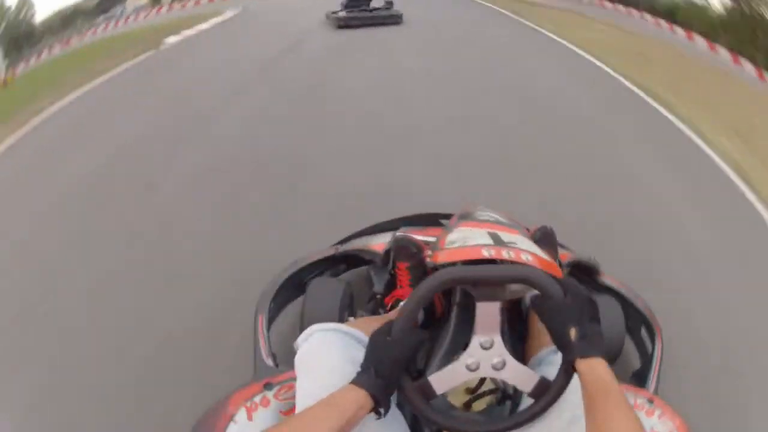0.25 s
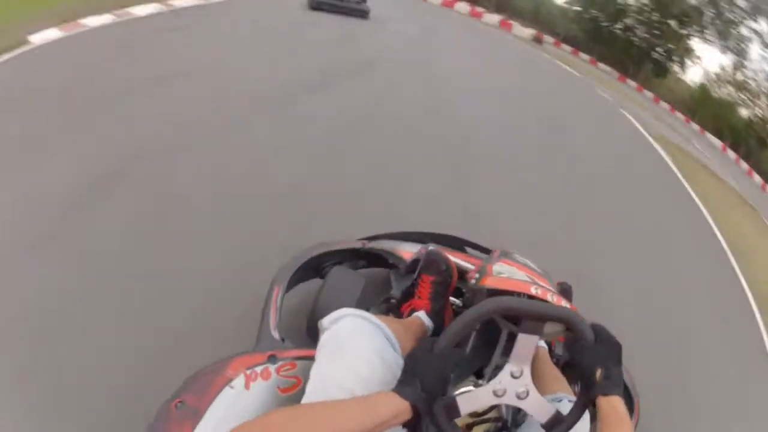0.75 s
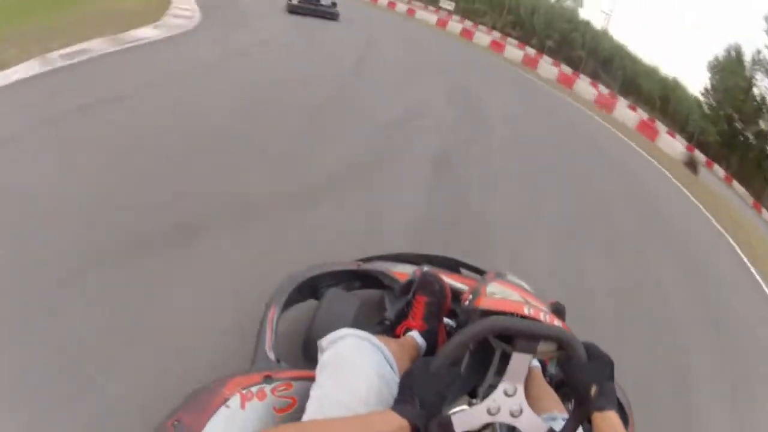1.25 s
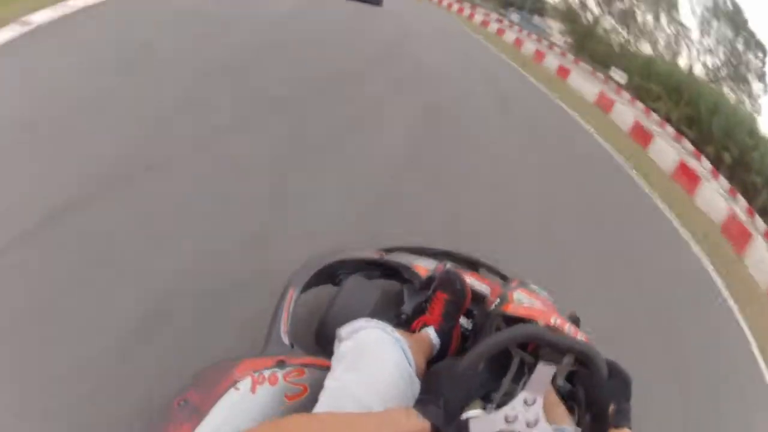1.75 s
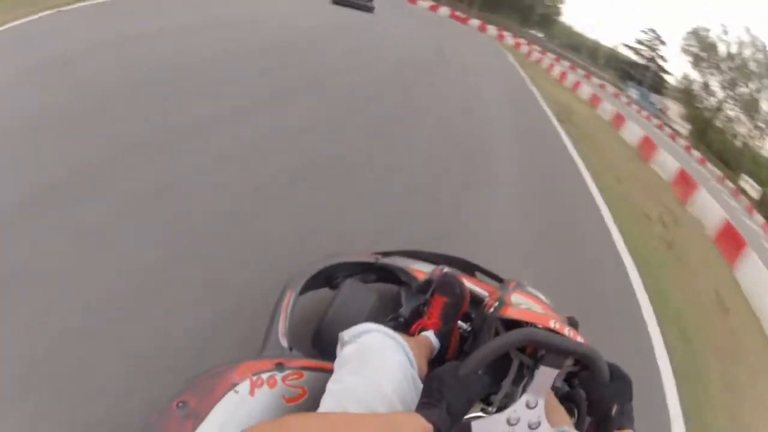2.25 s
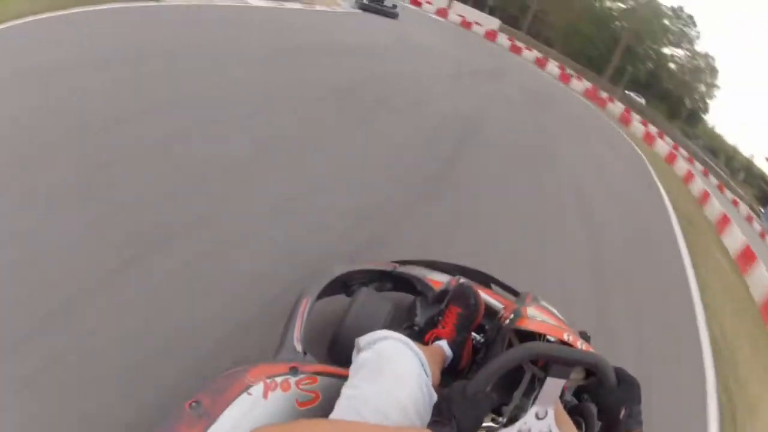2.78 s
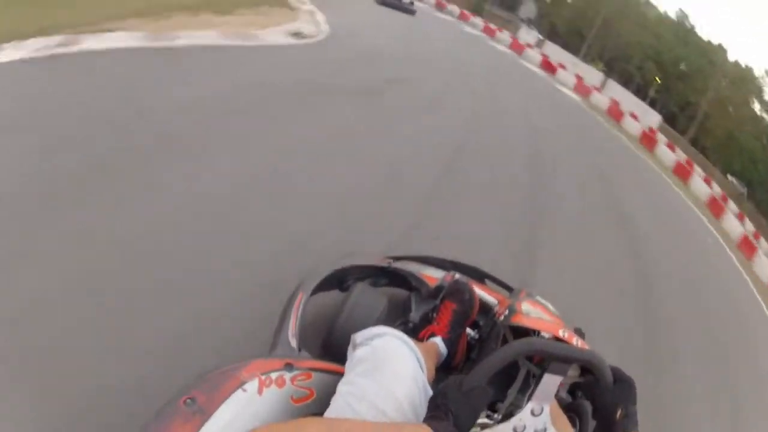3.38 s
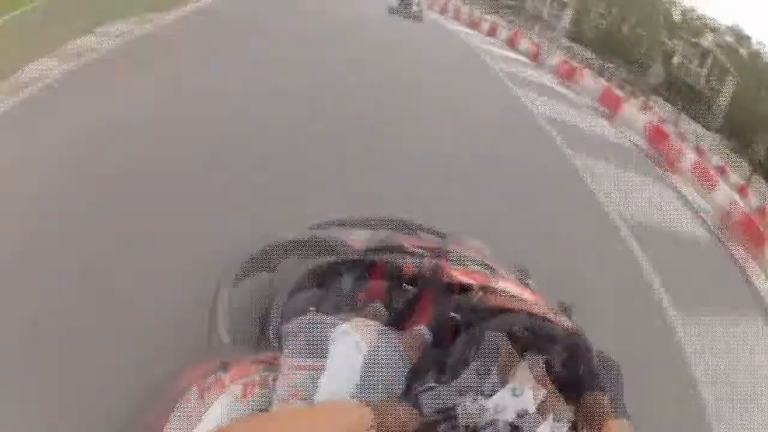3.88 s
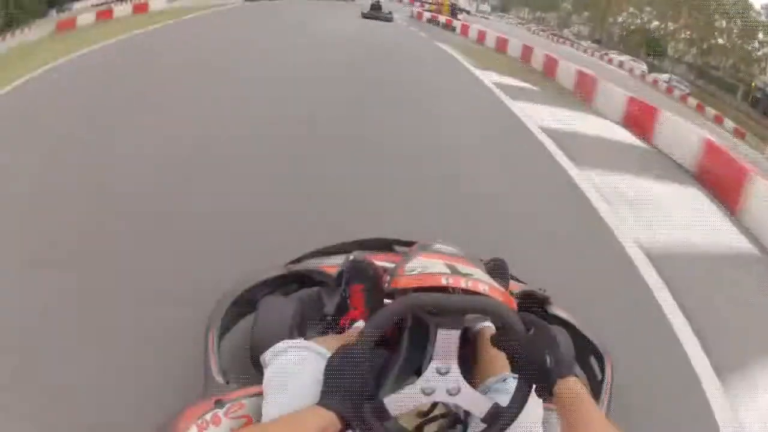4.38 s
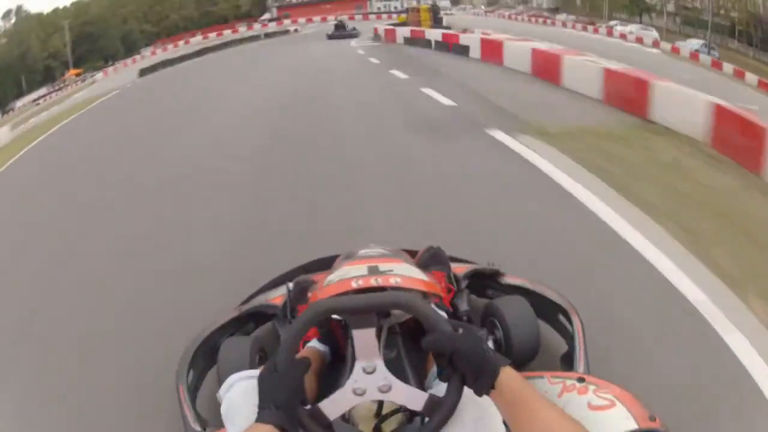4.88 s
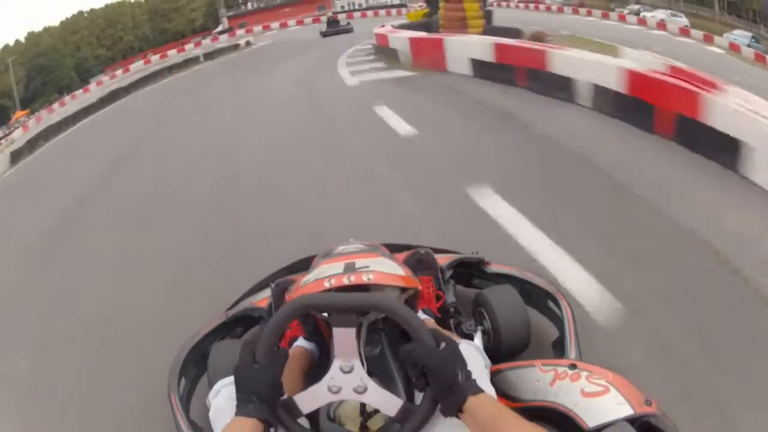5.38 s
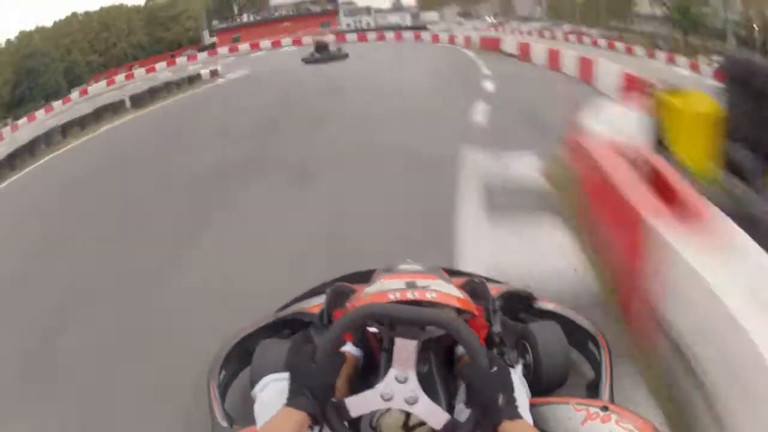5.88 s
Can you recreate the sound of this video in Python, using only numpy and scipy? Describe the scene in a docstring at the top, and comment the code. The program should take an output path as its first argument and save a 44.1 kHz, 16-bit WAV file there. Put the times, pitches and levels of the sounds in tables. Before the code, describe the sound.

Close on a driver's helmet outdoors, a small single-cylinder four-stroke kart drones at high throttle, raspy exhaust puffs mixed with hollow intake honks that soon bark harder. Wind and tyre hiss sit underneath. The sound fades nearly away, then abruptly returns at full level. Near the end the throttle shuts and the engine drops to a hollow, thumping frame boom with tiny tyre chirps, one knock and a short rattle. Narrow, slightly overloaded microphone with a thin metallic sizzle.

```python
"""A single-cylinder four-stroke kart drones and honks at the driver's helmet as it laps an outdoor track.
Each cycle is a ringing exhaust puff with a rasp of gas noise, then two air-box honks; the drive whines in sines.
Coloured noise makes wind and tyre hiss. The sound fades, then cuts back in at 4.46 s.
From 5.34 s the throttle shuts for a corner: the frame booms in thumps, chirps and rattles once.
Coarse sampling mirrors the engine into a thin sizzle near 12 kHz."""
import sys
import numpy as np
from scipy import signal
from scipy.fft import rfft, irfft
from scipy.io import wavfile

SR = 44100
rng = np.random.default_rng(int(sys.argv[2]) if len(sys.argv) > 2 else 0)


def unload_audio(sound):
    """Save the sound as a 16-bit wav file, at the path given as the first command line argument."""
    columns = np.transpose(np.atleast_2d(sound))
    # keep every value between -1 and 1, then stretch to whole-number steps
    steps = np.round(np.clip(columns, -1, 1) * 32767)
    wavfile.write(sys.argv[1], SR, steps.astype(np.int16))


N = 270333
TIME_S = np.arange(N) / SR

# engine speed: time_s, rate_cycles_per_s
ENGINE_SPEED = [(0.0, 34.8), (0.31, 34.38), (0.57, 34.56), (0.92, 35.46), (1.51, 36.06), (2.05, 35.31),
                (2.42, 34.95), (2.91, 33.99), (3.15, 34.24), (3.66, 33.71), (4.11, 32.54), (4.46, 32.5),
                (4.47, 33.32), (5.37, 34.75), (5.54, 34.11), (5.8, 33.63), (6.13, 32.32)]
# cornering: time_s, tyre_load_0_to_1
CORNERING = [(0, 0), (.3, .12), (.6, 0.34), (1.5, 0.46), (2.5, 0.76), (3.55, 0.9), (3.9, .75), (4.45, 0.8),
             (4.48, 0.32), (5.3, 0.09), (6.13, 0.58)]

# noise colours, relative: freq_hz, density_db_per_hz
WIND_COLOUR = [(15, -15), (35, -3.5), (70, -6.5), (140, 0), (250, -2.5), (400, -5.5), (550, -8.5),
               (700, -13), (1000, -33), (2000, -41)]
TYRE_COLOUR = [(300, -4), (800, 1.5), (1300, 2), (2000, 0.5), (2800, -2), (3600, -6), (4500, -8),
               (5500, -16)]
RASP_COLOUR = [(500, -13), (1200, -7.5), (2000, 1), (2700, 2.5), (3400, -3), (4000, -6), (4600, -11),
               (5500, -14)]
ROAR_COLOUR = [(100, -30), (250, -8), (400, -9.5), (580, 0.5), (700, -4.5), (900, -32), (2000, -56)]
# self-noise colour of each microphone, relative: freq_hz, density_db_per_hz
MIC_COLOUR = [(100, -5), (400, 10), (1000, -2), (4500, -3), (5400, -28), (6700, -30), (7500, 2),
              (10000, 4.5), (14000, 2)]
# stereo lean of hiss and rasp, rows left, right: gain_db
LEAN_DB = [
    [-0.82],
    [0.24],
]
# gusts on the helmet: time_s, above_steady_wind_db, length_s
GUSTS_ON_HELMET = [(0.32, 3.5, 0.074), (0.537, 5.5, 0.11), (3.7, 3.5, 0.21), (4.6, 4, 0.088)]

# squeals in the corner: time_s, level_db, pitch_hz, length_s
SQUEALS = [(5.568, -23.5, 967, 0.027), (5.688, -23.5, 1130, 0.011), (5.705, -25, 943, 0.019),
           (5.806, -23.5, 940, 0.017)]
# bumps through the frame: time_s, peak_db, pitch_hz, length_s
BUMPS = [(.31, -8, 90, 0.01), (4.62, -14, 152, 0.021), (6.075, 8.5, 172, 0.0031)]
# one rattle: time_s, level_db, length_s
RATTLE_BURST = (6.085, -19.5, 0.015)

# damped pulses: place_in_cycle_0_to_1, relative_peak (suction negative), ring_hz, length_s
EXHAUST_PULSES = [(.003, -0.15, 326, 0.0021), (.103, 0.41, 171, 0.0042)]
VALVE_OPENING_PULSES = [(.333, -0.71, 394.4, 0.0021)]
VALVE_CLOSING_PULSES = [(.635, -0.45, 335, 0.0032), (.675, 0.21, 436, 0.0041), (.85, -0.18, 412, 0.0037)]
DUCT_BARK_PULSES = [(.333, -0.13, 575, 0.0015), (.645, -0.15, 544, 0.0029)]
FRAME_THUMPS = [(0.543, 0.63, 149, 0.0058), (0.913, 0.95, 185, 0.0063), (0.33, 0.34, 310, 0.0044),
                (0.016, 0.97, 197, 0.0045)]
# rasp envelope within a cycle: rise_cycles, fall_cycles
RASP_RISE_FALL = (.09, .21)

# levels: straight_full_throttle_db, added_by_full_cornering_db, added_by_shut_throttle_db
EXHAUST_LEVELS = (-1.5, 3.5, -13)
VALVE_OPENING_LEVELS = (-1.47, 2, -40)
VALVE_CLOSING_LEVELS = (3.5, -6.5, -31)
DUCT_BARK_LEVELS = (-13.5, 3.5, -12)
RASP_LEVELS = (-29.3, 3.8, -22)
WIND_LEVELS = (-19.5, -5, 9)
TYRE_LEVELS = (-37.5, 6, 5)
# drive tones: multiple_of_cycle_rate, then the three level columns above
DRIVE_TONES = [(28, -42, 1.1, -5), (55, -50, 7.2, 0)]
# wander of the engine phase: rms_cycles, rate_limit_hz
PHASE_HUNT = (.004, 6)

START_PLACE_CYCLES, CUT_SKIP_CYCLES = -.38, .106
LIFT_S, LIFT_TAKES_S = 5.34, .15  # throttle starts to close, time it takes
LOOK_S, LOOK_TAKES_S, LOOK_DB = .52, .47, 12  # driver's head turn brings the intake duct to the ear
BOOM_S, BOOM_RISE_S, BOOM_END_S, BOOM_RELEASE_S, BOOM_DB = 5.45, .085, 6.06, .051, -1.1
FADE_S, FADED_GAIN, CUT_S, CUT_TAKES_S = 3.55, .11, 4.458, .016
HOLD_HZ, BAND_HZ, EDGE_HZ = 12000, 5460, 14500  # sample-hold rate, band ahead of it, final upper edge


def amp(db):
    """Decibels to gain."""
    return 10 ** (np.asarray(db) / 20)


def unit(x):
    """Scale to rms 1."""
    return x / np.sqrt(np.mean(x ** 2) + 1e-20)


def curve(rows):
    """Second column of a table, interpolated to every sample."""
    time_s, values = np.transpose(rows)
    return np.interp(TIME_S, time_s, values)


def ramp(start_s, length_s):
    """Linear rise from 0 to 1."""
    return np.clip((TIME_S - start_s) / length_s, 0, 1)


def bell(peak_s, length_s):
    """Gaussian swell with peak 1."""
    return np.exp(-np.minimum(((TIME_S - peak_s) / length_s) ** 2, 60))


def driven(straight_db, corner_db, shut_db):
    """Gain that follows cornering and throttle; the throttle bites most as it nears shut."""
    shut = ramp(LIFT_S, LIFT_TAKES_S) ** 1.64
    return amp(straight_db + corner_db * curve(CORNERING) + shut_db * shut)


def filtered_noise(gain):
    """White noise shaped by a gain per frequency bin, rms 1."""
    return unit(irfft(rfft(rng.standard_normal(N)) * gain, N))


def noise(colour):
    """Noise of the given colour, rms 1."""
    freq_hz, density_db = np.transpose(colour)
    log_bins = np.log(np.fft.rfftfreq(N, 1 / SR) + 1)
    return filtered_noise(amp(np.interp(log_bins, np.log(freq_hz), density_db)))


def drift(limit_hz):
    """Random wander of rms 1 with a Gaussian roll-off at limit_hz."""
    return filtered_noise(np.exp(-(np.fft.rfftfreq(N, 1 / SR) / limit_hz) ** 2))


def wide(colour, side_db):
    """Stereo noise: a common part plus a part of opposite sign left and right."""
    return noise(colour) + amp(side_db) * noise(colour) * np.array([[1], [-1]])


def lowpass(x, edge_hz, taps):
    """Steep FIR low-pass on both channels."""
    kernel = signal.firwin(taps, edge_hz, window=("kaiser", 9), fs=SR)
    return signal.oaconvolve(x, kernel[None], "same")


def pulses(rows, turns, uneven_db, jitter_s, detune):
    """Each pulse rings a damped cavity once a cycle, with random size, timing and pitch."""
    out = np.zeros(N)
    cycles = np.arange(-1, int(turns[-1]) + 1)
    for place, peak, ring_hz, length_s in rows:
        for cycle, (size, late, sharp) in zip(cycles, rng.standard_normal((len(cycles), 3))):
            if not turns[0] < cycle + place < turns[-1]:
                continue
            peak_s = TIME_S[np.searchsorted(turns, cycle + place)] + jitter_s * late
            near = slice(*np.searchsorted(TIME_S, [peak_s - 4 * length_s, peak_s + 4 * length_s]))
            t = TIME_S[near] - peak_s
            ring = np.exp(-(t / length_s) ** 2) * np.cos(2 * np.pi * ring_hz * (1 + detune * sharp) * t)
            out[near] += peak * amp(uneven_db * size) * ring
    return out


def air():
    """Lumpy, gusting helmet wind under tyre and air hiss; both drop as the boom ends."""
    calm = ramp(BOOM_END_S, BOOM_RELEASE_S)
    gusts_db = sum(db * bell(time_s, length_s) for time_s, db, length_s in GUSTS_ON_HELMET)
    wind_gain = driven(*WIND_LEVELS) * amp(gusts_db - 12 * calm + 2 * drift(16))
    hiss_gain = driven(*TYRE_LEVELS) * amp(-6 * calm + 2 * drift(59))
    wind = wind_gain * wide(WIND_COLOUR, side_db=-55)
    hiss = hiss_gain * wide(TYRE_COLOUR, side_db=-16.5)
    return wind + hiss * amp(LEAN_DB)


def chassis(octave_db=-8.5, waver_rad=.55, rough_db=2.5):
    """Rough squeals under braking, damped bumps in the road, and a noise rattle after the last one."""
    out = np.zeros(N)
    for time_s, db, pitch_hz, length_s in SQUEALS:
        angle = 2 * np.pi * pitch_hz * TIME_S + waver_rad * drift(200)
        squeal = np.sqrt(2) * (np.sin(angle) + amp(octave_db) * np.sin(2 * angle))
        out += amp(db + rough_db * drift(200)) * bell(time_s, length_s) * squeal
    for time_s, db, pitch_hz, length_s in BUMPS:
        out -= amp(db) * bell(time_s, length_s) * np.cos(2 * np.pi * pitch_hz * (TIME_S - time_s))
    time_s, db, length_s = RATTLE_BURST
    return out + amp(db + 2.7 * drift(400)) * bell(time_s, length_s) * noise(RASP_COLOUR)


def whine(turns, waver_rad=.44):
    """The drive sings at two multiples of the cycle rate, wavering in phase and level."""
    tones = np.zeros(N)
    for order, *levels in DRIVE_TONES:
        tones += driven(*levels) * np.sin(2 * np.pi * order * turns + waver_rad * drift(40))
    return np.sqrt(2) * tones * amp(2.4 * drift(30))


def boom(turns, shudder_db=-17):
    """With the throttle shut the engine shakes the frame in uneven thumps over a deep shudder."""
    release = np.exp(-np.maximum(TIME_S - BOOM_END_S, 0) / BOOM_RELEASE_S)
    level = amp(BOOM_DB) * ramp(BOOM_S, BOOM_RISE_S) * release
    shudder = amp(shudder_db + 3 * drift(15)) * np.cos(6 * np.pi * (turns - .56))  # 3 per cycle
    thumps = pulses(FRAME_THUMPS, turns, uneven_db=1.2, jitter_s=.00014, detune=.026)
    return level * (shudder + thumps)


def rasp(turns, uneven_db=1.03):
    """Hot gas tears out of the silencer after each firing and dies away over the cycle."""
    place, (rise, fall) = turns % 1, RASP_RISE_FALL
    gate = (1 - np.exp(-(place / rise) ** 2)) * np.exp(-place / fall)
    cycle_index = np.floor(turns).astype(int) + 1
    firing_db = uneven_db * rng.standard_normal(int(turns[-1]) + 2)[cycle_index]
    gain = driven(*RASP_LEVELS) * amp(firing_db + 1.5 * drift(500))
    return gain * gate / gate.max() * wide(RASP_COLOUR, side_db=-18) * amp(LEAN_DB)


def shake(turns):
    """The piston rocks the kart at crank speed, two turns a cycle."""
    return amp(-27.5) * np.cos(4 * np.pi * (turns - .1))


def intake(turns):
    """The air box honks and its duct barks as the intake valve opens and shuts, over rushing air."""
    looking = ramp(LOOK_S, LOOK_TAKES_S) * (TIME_S < CUT_S)
    opening = pulses(VALVE_OPENING_PULSES, turns, uneven_db=.6, jitter_s=.00004, detune=.015)
    closing = pulses(VALVE_CLOSING_PULSES, turns, uneven_db=.6, jitter_s=.00004, detune=.015)
    bark = pulses(DUCT_BARK_PULSES, turns, uneven_db=1, jitter_s=.00004, detune=.01)
    honks = driven(*VALVE_OPENING_LEVELS) * opening + driven(*VALVE_CLOSING_LEVELS) * closing
    roar = amp(-31) * driven(*VALVE_OPENING_LEVELS) * noise(ROAR_COLOUR)
    return honks + driven(*DUCT_BARK_LEVELS) * amp(LOOK_DB * looking) * bark + roar


def exhaust(turns):
    """Each firing sends a suction dip and a pressure puff through the exhaust."""
    puffs = pulses(EXHAUST_PULSES, turns, uneven_db=.5, jitter_s=.0001, detune=.033)
    return driven(*EXHAUST_LEVELS) * puffs


def engine_turns():
    """Engine phase in cycles: summed speed, a skip at the cut, and hunting that shifts the firings."""
    hunt_cycles, hunt_hz = PHASE_HUNT
    steady = START_PLACE_CYCLES + np.cumsum(curve(ENGINE_SPEED)) / SR
    return steady + CUT_SKIP_CYCLES * ramp(CUT_S, CUT_TAKES_S) + hunt_cycles * drift(hunt_hz)


def scene():
    """Sum of air, chassis and the sources locked to the engine phase."""
    turns = engine_turns()
    engine = shake(turns) + intake(turns) + exhaust(turns)
    return air() + chassis() + whine(turns) + boom(turns) + rasp(turns) + engine


def record(dry, self_hiss_db=-47):
    """Soft overload, a narrow band held at 12 kHz (which mirrors it upward), mic hiss, fade, band limit."""
    limited = dry / (1 + dry ** 8) ** (1 / 8)
    images = 1 + 2 * np.cos(2 * np.pi * HOLD_HZ * TIME_S)
    mirrored = lowpass(limited, BAND_HZ, taps=181) * images
    hold_response = np.sinc(np.fft.rfftfreq(N, 1 / SR) / HOLD_HZ)
    held = irfft(rfft(mirrored) * hold_response, N)
    hiss = amp(self_hiss_db) * np.array([noise(MIC_COLOUR), noise(MIC_COLOUR)])
    faded = ramp(FADE_S, CUT_S - FADE_S) - ramp(CUT_S, CUT_TAKES_S)
    fade_gain = 1 - (1 - FADED_GAIN) * faded
    return lowpass((held + hiss) * fade_gain, EDGE_HZ, taps=801)


dry = scene()
out = record(dry)
unload_audio(out)
```